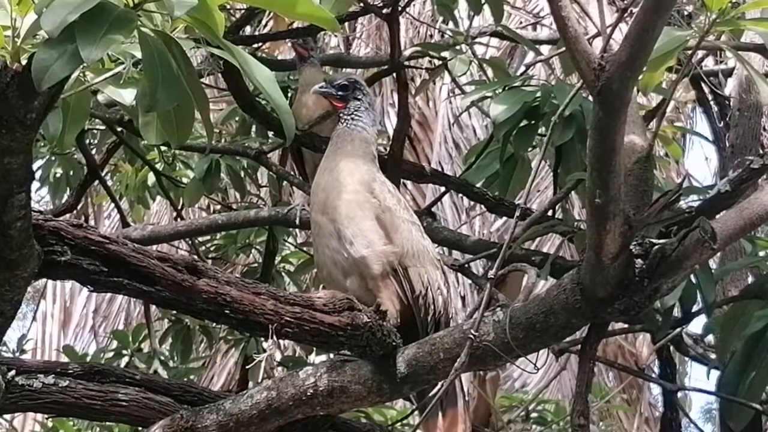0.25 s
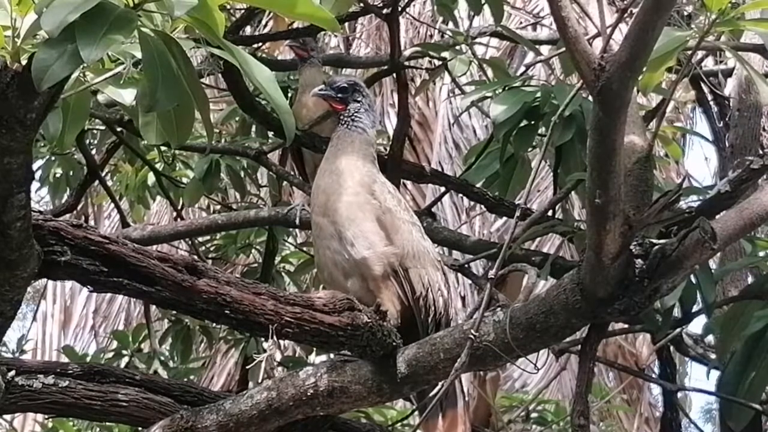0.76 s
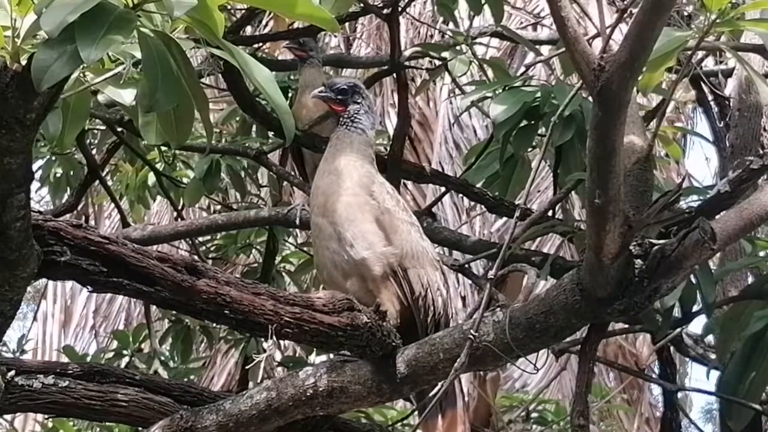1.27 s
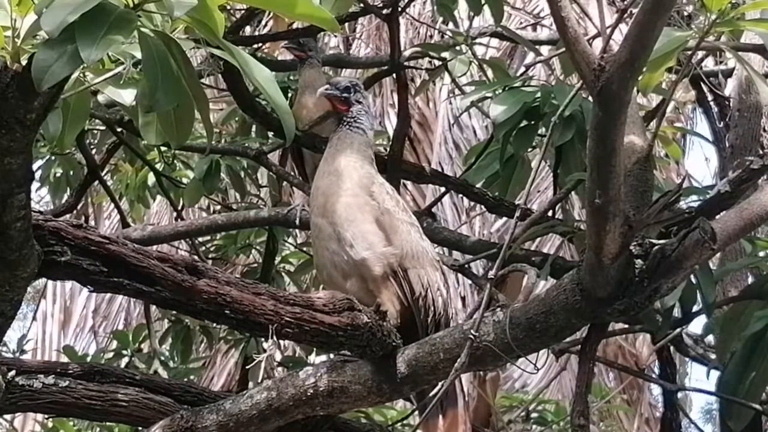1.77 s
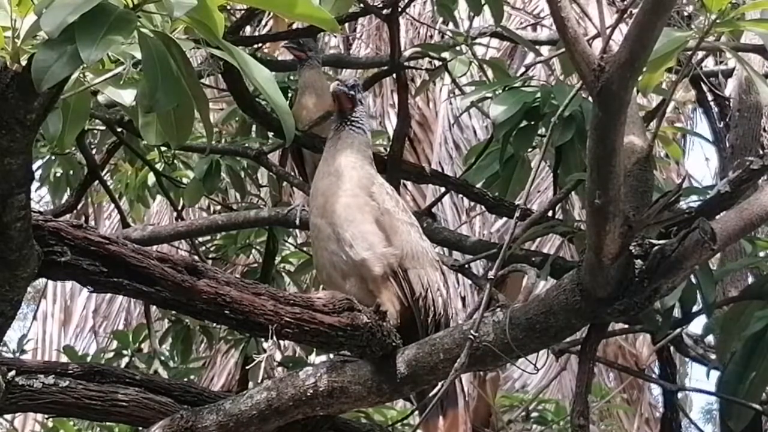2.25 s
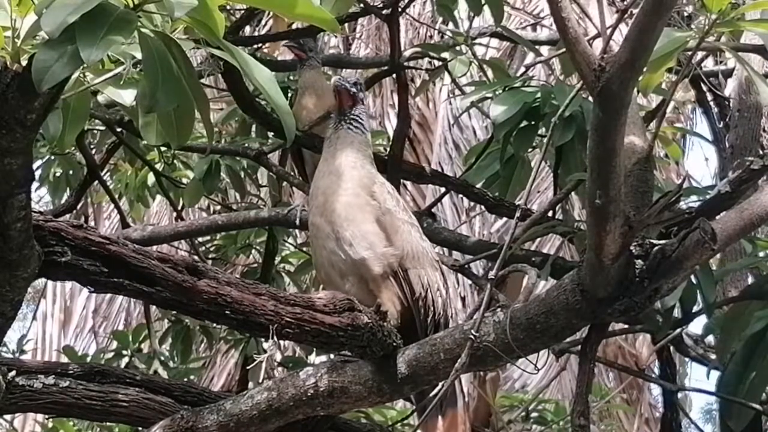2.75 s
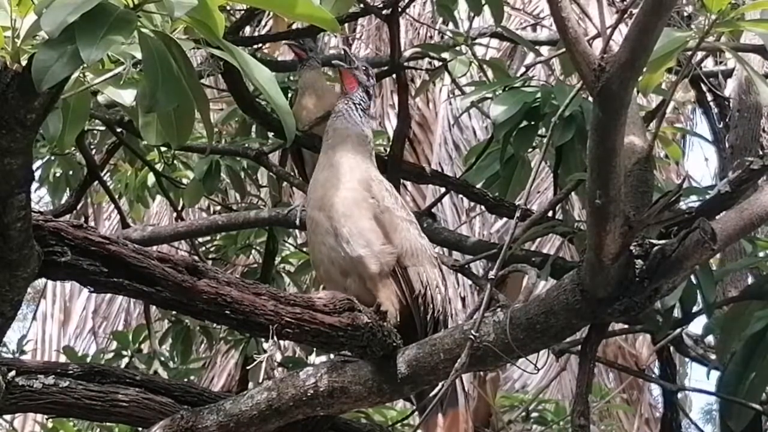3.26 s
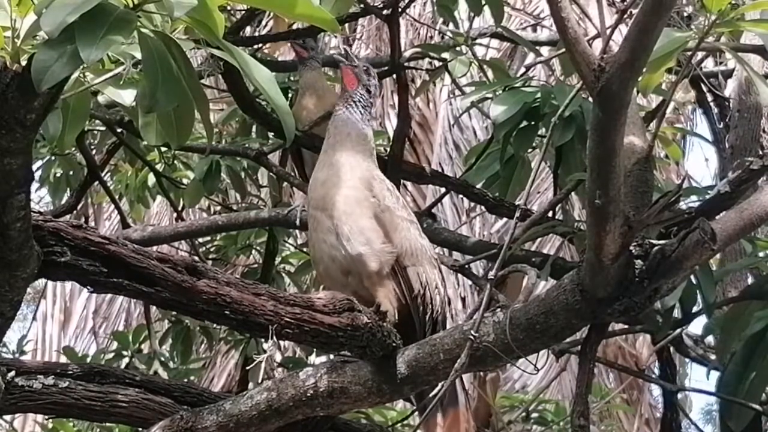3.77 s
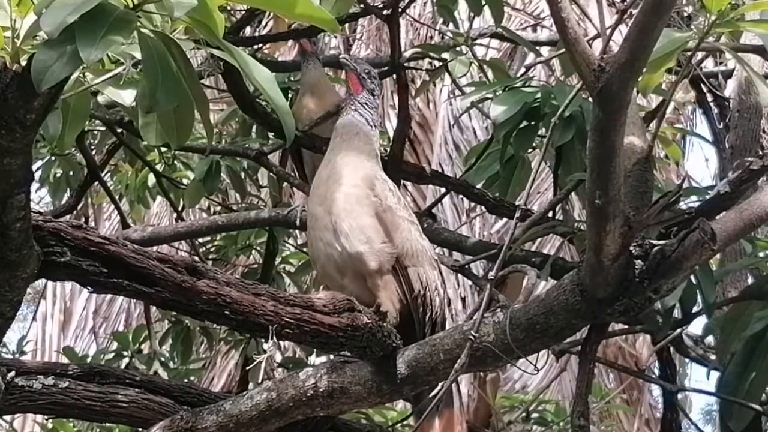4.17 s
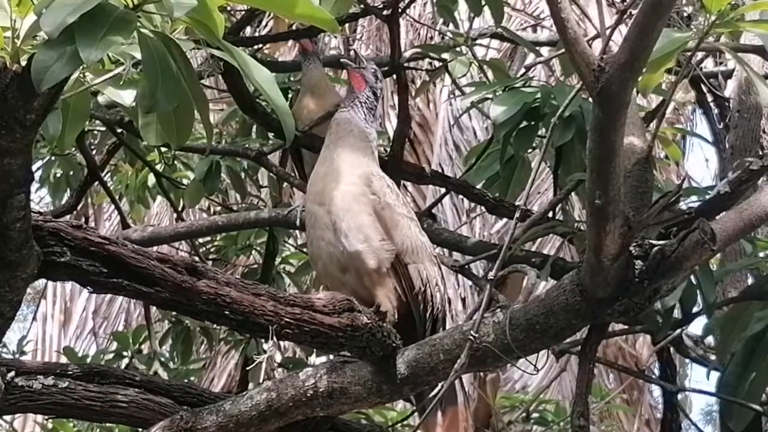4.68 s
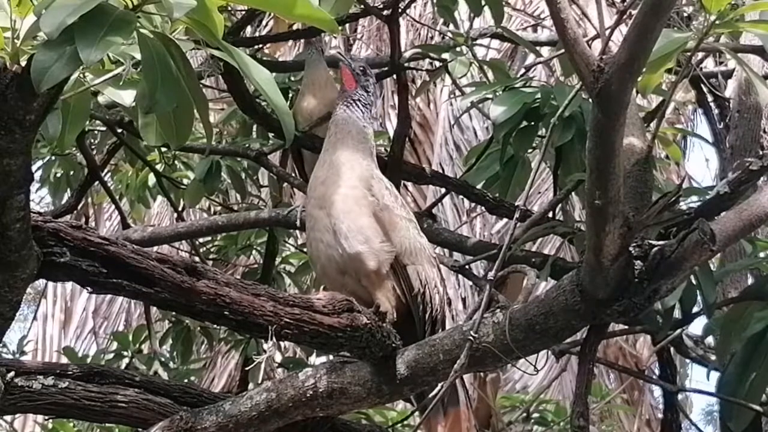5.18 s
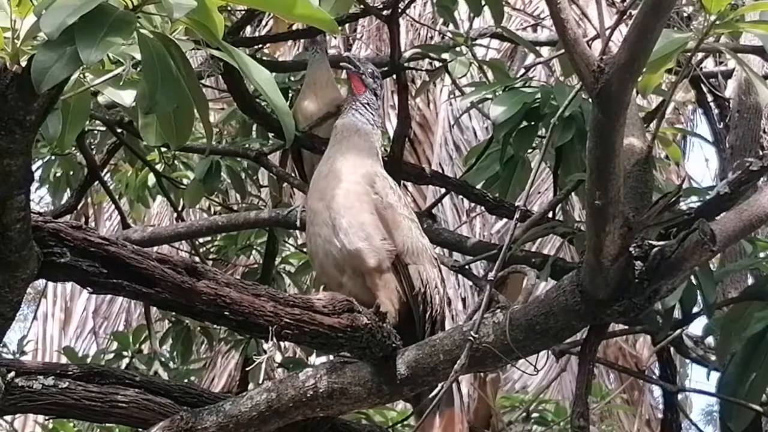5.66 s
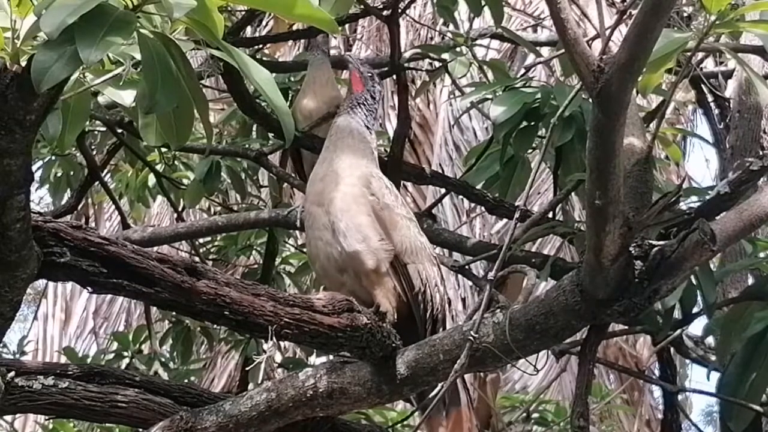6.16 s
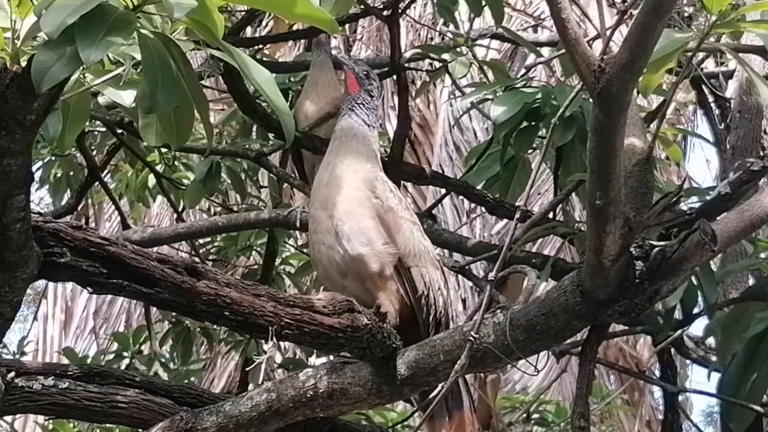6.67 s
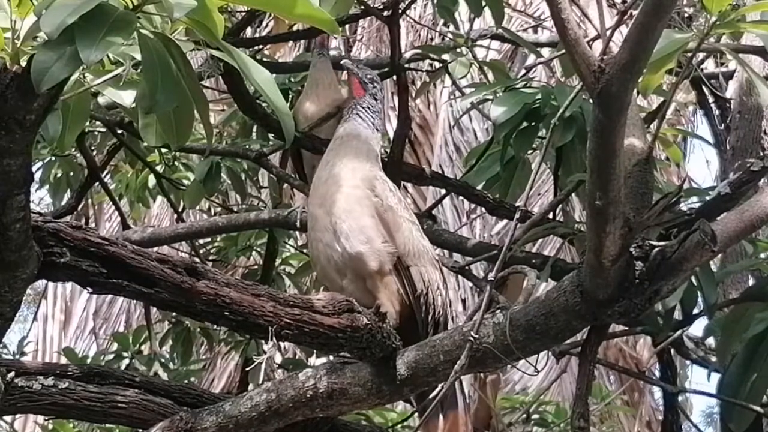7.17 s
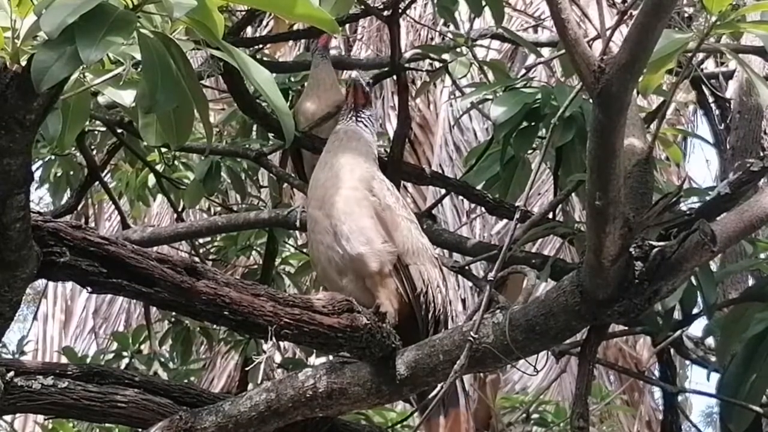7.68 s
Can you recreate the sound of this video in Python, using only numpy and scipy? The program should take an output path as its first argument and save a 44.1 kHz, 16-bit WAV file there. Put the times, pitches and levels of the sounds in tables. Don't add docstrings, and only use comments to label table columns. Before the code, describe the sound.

A faint gliding whistle and soft leaf hiss open the scene, then a muffled cluck and a loud upward squawk from a large bird at left. Hoarse chopped cries follow in bouts; another bird ahead overlaps and answers with barks and wails. A high-voiced mate squeaks and calls in the last bout. Close outdoor microphone, woody echoes, slight wind rumble.

```python
import sys
import numpy as np
from scipy import signal
from scipy.io import wavfile
from scipy.ndimage import uniform_filter1d

SR = 44100
rng = np.random.default_rng(int(sys.argv[2]) if len(sys.argv) > 2 else 0)


def attenuation_scalar(level_db):
    decades = np.asarray(level_db, float) / 20
    return 10 ** decades


def file_out(sig):
    cols = np.atleast_2d(sig).T
    lim = np.clip(cols, -1, 1)
    pcm = np.round(lim * 32767).astype(np.int16)
    wavfile.write(sys.argv[1], SR, pcm)


N = 349695
T = np.arange(N) / SR

WARMING = (.5, .5, .52, .08)
HOARSE = (.49, .49, .6, .47)
LEFT_VOICED = (.65, .875, .6, .22)
AHEAD_VOICED = (.66, .865, .45, .1)
FIRST_TRY = (.5, .5, .52, .3)
# (share of the length [0-1], pitch [ratio], tension [0-1], level [dB], brightness [dB])
CLUCK = [(0, 0.73, 0.1, -10, -14.5), (.2, .76, 0.1, -1, -6.5), (.55, 0.95, 0.6, -1.5, 0),
         (.9, 1.0, 0.4, -3, -0.5), (1, 1.0, 0.5, -15, 8.5)]
RISE = [(0, .74, 0.095, -14.5, -24.5), (.08, .76, 0.22, -8, -19), (.3, .85, .25, -3.5, -4),
        (.4, .88, .9, -5, -0.5), (.7, .98, 1.0, -2, -1), (1, 1.01, 0.86, -12.5, 2.5)]
FALL = [(0, 1.01, .8, -5.5, 5.5), (.33, .92, 0.91, -1, -0.5), (.7, .87, .9, -4, -0.5),
        (1, .84, 0.83, -20.5, 6)]
CHOP = [(0, .98, .6, -12.5, -2), (.2, 1.0, .7, -2, -1.2), (.5, 1.0, 0.64, -3.5, 0),
        (1, 1.02, 0.93, -18, 1.1)]
DRAWL = [(0, .97, .6, -3, 0), (.25, 1.0, .7, 0, 0.17), (.6, 1.01, .9, -6, 0), (1, 1.02, .8, -13.5, 0.71)]
ARCH = [(0, .8, .5, 1, 0), (.1, .93, .8, 0, 0), (.25, 0.99, 0.96, -3, 3), (.7, .88, .9, -4.5, 0.5),
        (.82, .83, .1, -7.5, 1.5), (1, .72, 0, -16.5, -10)]
SWOOP = [(0, .7, 0.062, -15, -15), (.13, .73, 0.054, -9.5, -8), (.15, .74, .05, -6.5, -11.5),
         (.32, .78, 0.031, -6.5, -6), (.57, .96, 1.0, -4, -1.5), (.9, 1.02, 0.82, -5, 0),
         (1, 1.1, 0.93, -9, 3.5)]
WAIL = [(0, .84, 0.025, -13.5, -0.5), (.11, .91, .85, -1, 0), (.27, 1, 0.93, 2.5, -3), (.7, .88, .9, -3, 1),
        (.8, .8, .05, -3.5, -2), (1, 0.65, 0.17, -15, 0.5)]
BARK = [(0, .98, 0.56, -8.5, 0.87), (.14, 1.0, .8, 0, 0.1), (.65, 1.0, .8, -3.5, 0),
        (1, 1.01, 0.38, -19, 0.88)]


def rms_one(x):
    return x / np.sqrt(np.mean(x ** 2) + 1e-20)


def band(x, low_hz, high_hz):
    edges_hz = [low_hz, min(high_hz, .45 * SR)]
    return signal.sosfilt(signal.butter(2, edges_hz, "band", fs=SR, output="sos"), x)


def wobble(size, rate_hz):
    r = np.exp(-2 * np.pi * rate_hz / SR)
    return rms_one(signal.lfilter([1], [1, -2 * r, r * r], rng.standard_normal(size + 2000))[2000:])


def phase(hz):
    return 2 * np.pi * np.cumsum(hz) / SR


def note(rows, fade_s=.004):
    s, *columns = np.transpose(rows)
    where = slice(int(s[0] * SR), min(int(s[-1] * SR), N))
    t = T[where]
    gate = np.clip(np.minimum(t - s[0], s[-1] - t) / fade_s, 0, 1)
    return where, [np.interp(t, s, c) for c in columns], gate


def swell(row, glide, rise_db, fall_db):
    start, top, end, hz, level_db = row
    return [(start, hz + glide * (start - top), level_db - rise_db),
            (top, hz, level_db),
            (end, hz + glide * (end - top), level_db - fall_db)]


def tones(notes, glide, rise_db, fall_db, second_db, shake):
    out = np.zeros(N)
    for row in notes:
        where, (hz, level_db), gate = note(swell(row, glide, rise_db, fall_db), fade_s=0.0071)
        turn = phase(hz * (1 + shake * wobble(len(hz), 40.0)))
        out[where] += gate * np.sqrt(2) * attenuation_scalar(level_db) * (np.sin(turn) + attenuation_scalar(second_db) * np.sin(2 * turn))
    return out


def resonate(x, modes):
    out = 0
    for k, (hz, width, level_db) in enumerate(modes):
        r = np.exp(-np.pi * width / SR)
        poles = [1, -2 * r * np.cos(2 * np.pi * hz / SR), r * r]
        out = out + (-1) ** k * attenuation_scalar(level_db) * signal.lfilter([(1 - r * r) / 2, 0, (r * r - 1) / 2], poles, x)
    return out


def wind():
    # (time [s], width [s], level [dB])
    gust_rows = [(.4, 0.31, -69.5), (1.25, 0.44, -62), (2.25, 0.34, -65.5), (3.331, 0.067, -72),
                 (2.649, 0.043, -53), (2.95, 0.1, -56), (3.58, 0.056, -49.5), (3.85, 0.08, -49.5),
                 (4.15, 0.078, -58), (5.64, 0.11, -60), (7.6, 0.91, -66)]
    calm_db = -86
    white = rng.standard_normal((3, N))
    rumble = rms_one(band(white[:2] + 1.3 * white[2], 18, 110))
    gusts = attenuation_scalar(calm_db) + sum(attenuation_scalar(db) * np.exp(-((T - s) / width) ** 2) for s, width, db in gust_rows)
    return rumble * gusts * attenuation_scalar(2.5 * wobble(N, 12.0))


def air():
    # (frequency [Hz], level [dB per Hz])
    spectrum = [(88, -31), (150, -5.5), (1240, -13.5), (1600, -15), (2180, -15.5), (4220, -26), (5990, -23),
                (15500, -54)]
    level_total_db = -69.5
    hz, db = np.transpose(spectrum)
    edges = 150 * 2 ** np.arange(0, 7, .5)
    white = rng.standard_normal((2, 3, N))
    out = 0
    for k, (low, high) in enumerate(zip(edges, edges[1:])):
        level_db = np.interp(np.log(low * high) / 2, np.log(hz), db)
        own, shared = white[k % 2, :2], white[k % 2, 2]
        out = out + attenuation_scalar(level_db) * band(own + 4.8 * shared, low, high)
    return attenuation_scalar(level_total_db) * rms_one(out)


def hum():
    # (start [s], loudest [s], end [s], pitch [Hz], level [dB])
    drones = [
        (.9, 1.304, 1.6, 64.8, -63),
        (6.8, 7.1, 7.7, 103.2, -64),
    ]
    return tones(drones, glide=4.0, rise_db=8.5, fall_db=7.0, second_db=-33, shake=0.057)


def whistle():
    # (time [s], level [dB])
    strength = [(0.0, -54.5), (.08, -68), (.16, -71), (.24, -53.5), (.34, -61.5), (.52, -50.5), (.6, -58.5),
                (.66, -55.5), (.76, -94)]
    start_hz, glide, octave_db = 692, 172, -79
    out = np.zeros(N)
    where, (level_db,), gate = note(strength, fade_s=0.0026)
    turn = phase((start_hz + glide * T[where]) * (1 + 0.0013 * wobble(len(gate), 40.0)))
    octave = attenuation_scalar(octave_db + 3.8 * wobble(len(gate), 9.9)) * np.sin(2 * turn)
    out[where] = gate * np.sqrt(2) * (attenuation_scalar(level_db) * np.sin(turn) + octave)
    return out


def buzzes():
    early = [(0.0, -2.4, 0.26, 3720, -61), (0.137, 0.3, 0.32, 3600, -67.5), (0.9, 0.3, 2.4, 7300, -83),
             (1.33, -3.7, 1.52, 7200, -79.5), (5.65, 4.5, 6.3, 7800, -71), (7.09, 4.5, 7.36, 3820, -66)]
    last = [(7.64, 7.71, 7.8, 5500, -76), (7.745, 7.775, 8.0, 5700, -66), (7.824, 7.832, 8.1, 5400, -58),
            (7.824, 7.835, 8.1, 3600, -73), (7.824, 7.84, 8.15, 10930, -73)]
    out = np.zeros(N)
    for row in early + last:
        where, (hz, level_db), gate = note(swell(row, 0, rise_db=20, fall_db=20), fade_s=0.005)
        turn = phase(hz * (1 + 0.066 * wobble(len(hz), 460.0)))
        out[where] += gate * np.sqrt(2) * attenuation_scalar(level_db + 1.0 * wobble(len(hz), 60.0)) * np.sin(turn)
    return out


def far_birds():
    # (start [s], turn of the level [s], end [s], pitch at the turn [Hz], level at the turn [dB])
    coo_falling = [
        (.1, .292, 0.4, 1246, -61),
    ]
    coo_held = [
        (0.939, 0.992, 1.03, 612, -52),
    ]
    peeps = [
        (.1, .3, 0.66, 3530, -84.5),
    ]
    chirps = [
        (7.69, 7.738, 7.9, 3610, -76.5),
    ]
    return (tones(coo_falling, glide=-700, rise_db=12, fall_db=21.0, second_db=-21.0, shake=0.0048)
            + tones(coo_held, glide=130, rise_db=6, fall_db=-1.0, second_db=-33.5, shake=.006)
            + tones(peeps, glide=-32.5, rise_db=-4.5, fall_db=-3.0, second_db=-44, shake=0.012)
            + tones(chirps, glide=-400, rise_db=10, fall_db=9.0, second_db=-31.5, shake=0.0194)
            + buzzes())


def grove(x, tail_db, leaves_db):
    # (frequency [Hz], T60 [s])
    decay = [(300, 0.56), (1200, 0.65), (2500, 0.64), (6000, 0.82), (12000, 0.49)]
    hz, seconds = np.transpose(decay)
    t = T[:int(1.2 * SR)]
    white = rng.standard_normal((3, 2, len(t)))
    edges = 200 * 2. ** np.arange(7)
    tail = 0
    for k, (low, high) in enumerate(zip(edges, np.append(edges[1:], 18000))):
        t60 = np.interp(np.log(low * np.sqrt(2)), np.log(hz), seconds)
        fading = attenuation_scalar(-100 * t / t60) + 0.19 * attenuation_scalar(-40 * t / t60)
        tail = tail + band(white[k % 2], low, high) * fading * (1 - np.exp(-t / 0.0024))
    leaves = band(band(white[2], 1900, 18000), 1900, 18000) * np.exp(-t / .003)

    def sent_back(sound, echo):
        echo = echo / np.sqrt(np.sum(echo ** 2) / 2)
        return signal.fftconvolve(sound[None], echo, axes=1)[:, :N]

    swayed = np.interp(T + .0001 * wobble(N, 25.0), T, x)
    flutter = np.tanh([wobble(N, 12.0), wobble(N, 19.0)]) * 1.494
    return attenuation_scalar(tail_db) * sent_back(swayed, tail) + attenuation_scalar(leaves_db) * flutter * sent_back(x, leaves)


def mate(notes, glide, rise_db, fall_db, rasp_db, scoop_hz, jump_hz, dip_db):
    # (centre [Hz], width [Hz], level [dB])
    rasp_modes = [(1290, 320, 15), (1780, 570, -0.5), (2750, 1400, 0.5), (3120, 970, 7), (5440, 1200, 0),
                  (9550, 4100, -40.5)]
    # (frequency [Hz], level [dB])
    beak_curve = [(600, -29.5), (1250, 1.5), (1800, -11.5), (2400, -13.5), (2680, -8.5), (3050, -10.5),
                  (3300, -12.5), (4000, -23.5), (6500, -16)]
    scoop_s, jump_s, break_s = .008, .005, .02
    plateau_db = 13
    rasp_rises, rasp_falls = -0.38, 0.24
    clear_delay, rasp_dip_share = 0.26, 0.33
    out = np.zeros(N)
    for row in notes:
        start, top, end, _, peak_db = row
        where, (hz, level_db), gate = note(swell(row, glide, rise_db, fall_db))
        t, size, rise_s = T[where], len(hz), top - start
        level_db = peak_db - (peak_db - level_db) ** 2 / plateau_db
        hz = hz - scoop_hz * np.exp(-(t - start) / scoop_s)
        hz = hz + jump_hz * np.tanh((t - top) / jump_s) / 2
        breaking = np.exp((t - end) / break_s)
        turn = phase(hz * (1 + (.004 + .07 * breaking) * wobble(size, 90.0))) / 2
        grown = (t - start) / (clear_delay * rise_s)
        clear = 0
        for k in range(1, 11):
            partial_db = np.interp(k * hz / 2, *np.transpose(beak_curve)) + 2.0 * np.tanh(wobble(size, 46.0))
            growth = 1 - np.exp(-(2 * grown / max(k, 2)) ** 2)
            clear = clear + attenuation_scalar(partial_db) * growth * np.sin(k * turn + k * k)
        breath = rng.standard_normal(size) * (1 + 0.12 * np.sin(turn))
        rasp = band(band(resonate(breath, rasp_modes), 800, 11000), 650, 14000)
        rasp_level_db = peak_db + rasp_db + np.where(t < top, rasp_rises, rasp_falls) * (level_db - peak_db)
        rasp_level_db = rasp_level_db - dip_db * np.exp(-((t - top + .25 * rise_s) / (rasp_dip_share * rise_s)) ** 2)
        out[where] += gate * (np.sqrt(2) * attenuation_scalar(level_db - 1.5) * clear + attenuation_scalar(rasp_level_db) * rms_one(rasp))
    return out


def mate_calls():
    # (start [s], loudest [s], end [s], pitch when loudest [Hz], level [dB])
    held = [
        (5.354, 5.45, 5.498, 1211, -16),
    ]
    last = [
        (6.59, 6.648, 6.715, 1304, -17),
    ]
    squeaks = [
        (4.92, 4.985, 5.005, 1500, -32),
        (5.05, 5.075, 5.1, 1534, -27.5),
    ]
    rising = [
        (5.165, 5.215, 5.275, 1299, -20.5),
        (6.14, 6.187, 6.24, 1285, -20),
    ]
    short = [
        (6.26, 6.275, 6.305, 1207, -20.5),
    ]
    climbing = [
        (6.345, 6.435, 6.49, 1339, -20.5),
    ]
    piping = [
        (6.2, 6.216, 6.3, 1838, -31),
        (6.455, 6.475, 6.47, 1800, -20),
        (6.55, 6.57, 6.59, 1790, -38),
    ]
    hoarse = [
        (4.92, 5.07, 5.1, 1198, -35.5),
    ]
    return (mate(held, glide=120, rise_db=5.5, fall_db=17.0, rasp_db=-7.0, scoop_hz=260.4, jump_hz=0, dip_db=10.0)
            + mate(last, glide=98, rise_db=10.5, fall_db=24.0, rasp_db=-7.0, scoop_hz=259, jump_hz=0, dip_db=0.0)
            + tones(squeaks, glide=2500, rise_db=7, fall_db=7, second_db=-20.5, shake=.03)
            + mate(rising, glide=250, rise_db=8.0, fall_db=14.5, rasp_db=-8.5, scoop_hz=60, jump_hz=60, dip_db=1.5)
            + mate(short, glide=50, rise_db=4.5, fall_db=11.0, rasp_db=-8.5, scoop_hz=30, jump_hz=0, dip_db=6.5)
            + mate(climbing, glide=1100, rise_db=9.5, fall_db=11.0, rasp_db=-9.0, scoop_hz=60.3, jump_hz=0,
                   dip_db=2.5)
            + tones(piping, glide=30, rise_db=8, fall_db=9.5, second_db=-31.5, shake=0.0052)
            + mate(hoarse, glide=-500, rise_db=-1.5, fall_db=-3.0, rasp_db=-1.0, scoop_hz=260, jump_hz=0,
                   dip_db=1.5))


def syllable(row, shape):
    s, length, level_db, hz, bright_db = row
    return [(s + share * length, hz * ratio, tension, level_db + db, bright_db + open_db)
            for share, ratio, tension, db, open_db in shape]


def evened(x, span_s=.025):
    return x / np.sqrt(uniform_filter1d(x ** 2, int(span_s * SR), mode="reflect") + 1e-12)


def membrane(hz, shake, unevenness):
    turns = np.cumsum(hz * (1 + shake * wobble(len(hz), 150.0)) / SR) + rng.random()
    alternation = np.clip(unevenness * (.5 + wobble(len(hz), 54.0)), -.9, .9)
    return turns % 1 * (1 + alternation * (-1) ** turns.astype(int))


def beak(x, modes, opening):
    closed = [(hz * .88, width, level_db) for hz, width, level_db in modes]
    return opening * resonate(x, modes) + (1 - opening) * resonate(x, closed)


def cry(row, shape, voice, pipe, low_hz, cut_hz, middle_lift_db):
    snap_tension = (.3, .5)
    _, _, _, pitch_hz, bright_db = row
    low_modes, middle_modes, top_modes, edge_modes = pipe
    where, (second_hz, tension, low_db, top_db), gate = note(syllable(row, shape), fade_s=.0025)
    size = len(gate)
    first_hz = second_hz * np.interp(tension, snap_tension, voice[:2])
    rough = np.interp(tension, [0, 1], voice[2:])
    shake = .13 * rough
    first = 1.42 + membrane(first_hz, shake, 0.94 * rough)
    flow = first * (1.49 + membrane(second_hz, shake, 0.99 * rough))
    strength = attenuation_scalar(3.6 * rough * 1.7 * np.tanh(0.88 * wobble(size, 120.0)))
    snaps = rms_one(np.diff(flow, prepend=flow[0])) * strength
    hiss = (0.022 + rough) * strength * rms_one(flow ** 3 * rng.standard_normal(size))

    opening = np.clip((second_hz / pitch_hz - .74) / .2, 0, 1)
    low = band(band(beak(snaps + .3 * hiss, low_modes, opening), low_hz, 1350), cut_hz, 4000)
    bass_hz = 2 * low_hz - 170
    bass = evened(band(band(snaps, bass_hz, 470), bass_hz, 470))
    slack = attenuation_scalar(-16) * np.interp(tension, snap_tension, [1, 0]) * bass
    middle_db = 3.5 + middle_lift_db + .6 * (top_db - bright_db) + 0.5 * bright_db
    middle = band(resonate(snaps + 2.0 * hiss, middle_modes), 1300, 3100)
    edge = resonate(snaps ** 2 * np.sign(snaps) / 8.7 + .3 * hiss, edge_modes)
    edge = attenuation_scalar(0.68 * (top_db - 2.5)) * edge
    top = band(resonate(snaps + 1.0 * hiss, top_modes) + edge, 2800, 12500)
    voiced = evened(low) + slack + attenuation_scalar(middle_db) * evened(middle) + attenuation_scalar(top_db) * evened(top)
    return where, gate * attenuation_scalar(low_db) * voiced


def cries(groups, pipe, low_hz, cut_hz, middle_lift_db):
    out = np.zeros(N)
    for shape, voice, rows in groups:
        for row in rows:
            where, sound = cry(row, shape, voice, pipe, low_hz, cut_hz, middle_lift_db)
            out[where] += sound
    return out


def ahead_bird():
    # (shape, voice, rows of (start [s], length [s], level [dB], fast membrane [Hz], brightness [dB]))
    syllables = [
        (RISE, AHEAD_VOICED, [(3.16, 0.1, -28.5, 563.3, -3), (4.46, .14, -28, 606, -2), (5.772, 0.14, -18, 601.6, -3.5)]),
        (FALL, AHEAD_VOICED, [(4.627, 0.085, -27.5, 612, -7), (5.947, 0.073, -20, 611.3, -5)]),
        (BARK, AHEAD_VOICED, [(3.406, 0.058, -25.5, 612, -3), (4.74, 0.053, -26, 610, -2.5), (6.053, 0.05, -23, 622, -2.5)]),
        (DRAWL, AHEAD_VOICED, [(3.462, 0.1, -23, 603, -4.5), (3.672, 0.19, -30, 589, -5.5), (4.795, .095, -26, 634.4, -1.1), (6.109, 0.099, -26, 649.8, 0.3)]),
        (CLUCK, AHEAD_VOICED, [(3.636, 0.07, -32.5, 579, -4)]),
        (ARCH, AHEAD_VOICED, [(3.3, 0.068, -25, 551, -8.5)]),
        (WAIL, AHEAD_VOICED, [(4.95, .29, -25.5, 601, -4.5), (6.29, 0.26, -25, 600.4, -3.5)]),
    ]
    # (centre [Hz], width [Hz], level [dB])
    pipe = [
        [(510, 2000, -10.5), (989, 293, 3)],
        [(1602, 110, -1), (2038, 227, 12.5), (2320, 690, 8.5)],
        [(3340, 595, -1.5), (4670, 1660, -3.5), (5254, 1214, -1)],
        [(6500, 1200, -22.5), (10560, 1300, -21)],
    ]
    return cries(syllables, pipe, low_hz=228, cut_hz=380, middle_lift_db=-0.75)


def left_warm_up():
    # (shape, voice, rows of (start [s], length [s], level [dB], fast membrane [Hz], brightness [dB]))
    syllables = [
        (CLUCK, FIRST_TRY, [(1.022, .14, -22.5, 529.8, -21.5)]),
        (SWOOP, WARMING, [(1.54, 0.19, -14.5, 603.3, -14)]),
    ]
    # (centre [Hz], width [Hz], level [dB])
    cluck_pipe = [
        [(480, 1000, -2.5), (1040, 260, 10.5)],
        [(1600, 150, -1), (2300, 430, 0.5), (2800, 500, -1)],
        [(3000, 300, 8.5), (4100, 900, 2), (5340, 550, -1)],
        [(6500, 1000, -17), (9600, 2000, -15.5)],
    ]
    swoop_pipe = [
        [(494, 760, -4), (1000, 250, 12.5)],
        [(1490, 270, -5.5), (2095, 170, 6), (2560, 280, 0.5)],
        [(3700, 610, 1), (4600, 820, 0.097), (5240, 550, -2)],
        [(6500, 1000, -16), (9600, 2000, -22.5)],
    ]
    return (cries(syllables[:1], cluck_pipe, low_hz=188, cut_hz=86, middle_lift_db=3.0)
            + cries(syllables[1:], swoop_pipe, low_hz=188, cut_hz=62, middle_lift_db=5.0))


def left_bird():
    # (shape, voice, rows of (start [s], length [s], level [dB], fast membrane [Hz], brightness [dB]))
    syllables = [
        (CHOP, HOARSE, [(1.79, 0.026, -16.5, 627.4, -6), (1.84, 0.052, -20.5, 631, -5.5)]),
        (DRAWL, HOARSE, [(1.887, 0.051, -23.5, 641.2, -9), (2.474, 0.064, -24.5, 498.6, -5.5)]),
        (RISE, LEFT_VOICED, [(2.266, 0.14, -21, 549.8, -5), (3.5, 0.11, -25, 565.3, 0)]),
        (CHOP, LEFT_VOICED, [(2.588, 0.032, -21, 479.7, -4), (2.638, 0.036, -25, 492.5, -1.5), (3.782, 0.034, -25.5, 549.6, 0), (3.84, 0.033, -28, 556, 1)]),
        (DRAWL, LEFT_VOICED, [(2.678, 0.058, -25, 498, -6), (3.882, 0.07, -29.5, 507, -3)]),
        (ARCH, LEFT_VOICED, [(2.881, 0.28, -26.5, 522, -5), (4.09, 0.24, -30, 516, -5.5)]),
    ]
    # (centre [Hz], width [Hz], level [dB])
    pipe = [
        [(414, 1670, -3.5), (1008, 134, 14.5)],
        [(1510, 200, -6.5), (2148, 200, -1), (2786, 590, -9.5)],
        [(2916, 750, 3.5), (3600, 530, 4.5), (4410, 530, 3), (5440, 1240, -2)],
        [(6760, 2640, -3), (9850, 4300, -15.5)],
    ]
    return cries(syllables, pipe, low_hz=197.7, cut_hz=74, middle_lift_db=1.77)


def scene():
    first, later = left_warm_up(), left_bird()
    ahead, high, far = ahead_bird(), mate_calls(), far_birds()
    left = first + later
    left_lead_s = .00021
    left_pair = np.array([left * attenuation_scalar(3.0), np.interp(T - left_lead_s, T, left) * attenuation_scalar(-2.0)])
    direct = left_pair + ahead * attenuation_scalar([[-1.3], [-.7]]) + high * attenuation_scalar([[-.8], [-1.2]])
    echoes = grove(later + attenuation_scalar(-5.5) * first, tail_db=-10, leaves_db=-1.5)
    echoes = echoes + grove(ahead + 2.0 * far, tail_db=-4.5, leaves_db=-1.0)
    echoes = echoes + grove(high, tail_db=-4.0, leaves_db=-2.5)
    distant = (far + whistle()) * attenuation_scalar([[.3], [-1.5]])
    loudness = np.sqrt(signal.lfilter([16.0 / SR], [1, 16.0 / SR - 1], np.mean(direct ** 2, axis=0)))
    ducked = 1 / (1 + 10.0 * loudness)
    return direct + echoes + distant + hum() + ducked ** 0.79 * air() + ducked ** 1.3 * wind()


def band_limit(x):
    return signal.sosfilt(signal.butter(12, 16370, fs=SR, output="sos"), x)


def record(dry):
    rounded = 0.99 * np.tanh(dry / 0.97)
    mix = signal.sosfilt(signal.cheby2(10, 60, 16350, fs=SR, output="sos"), rounded)
    return band_limit(mix)


dry = scene()
out = record(dry)
file_out(out)
```